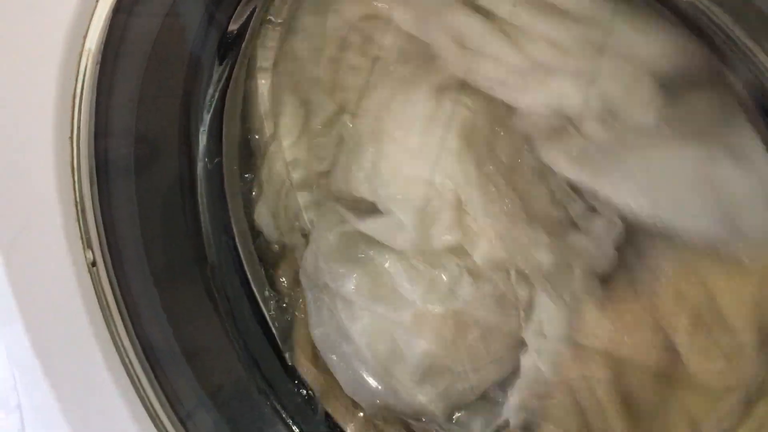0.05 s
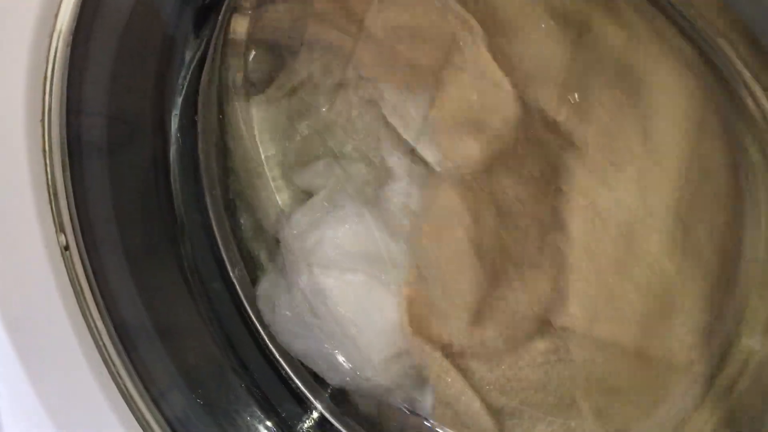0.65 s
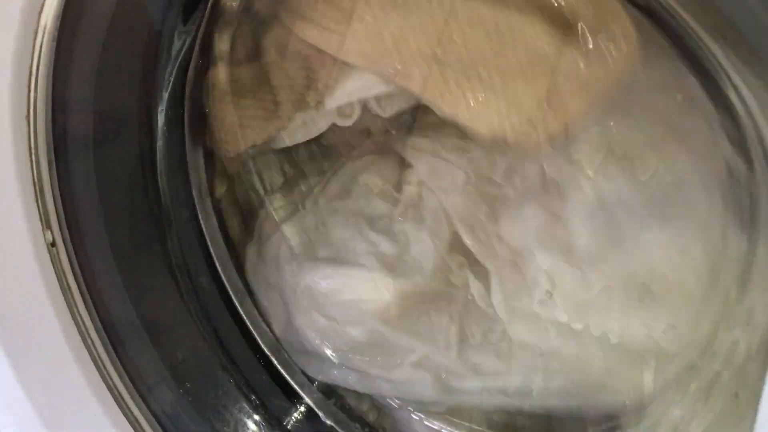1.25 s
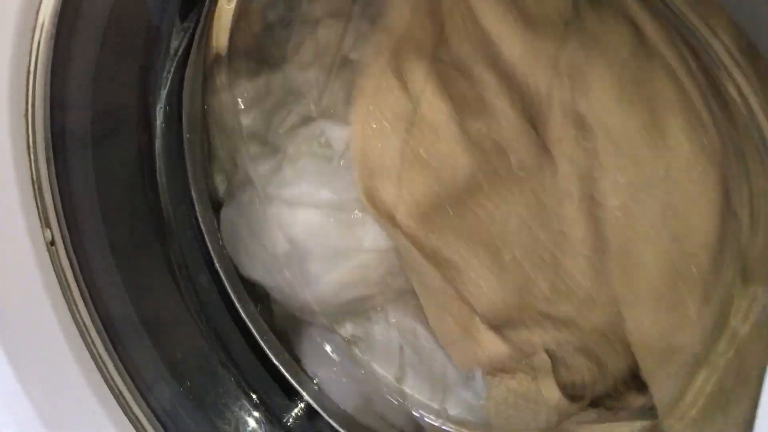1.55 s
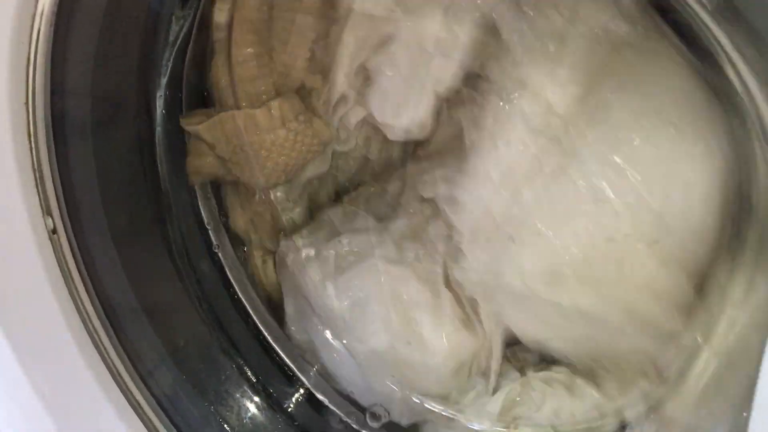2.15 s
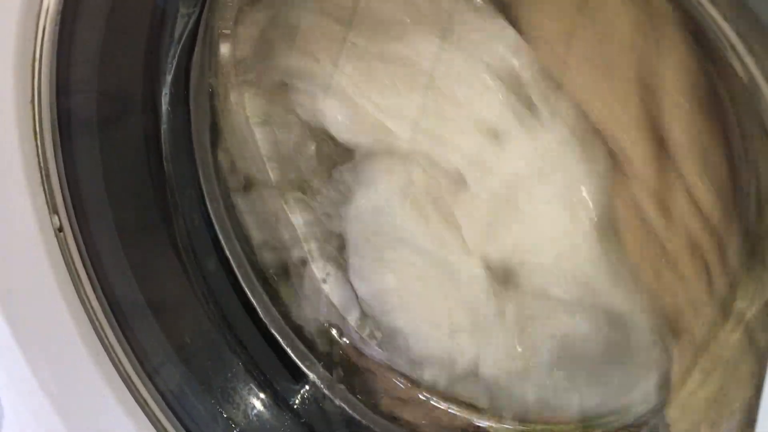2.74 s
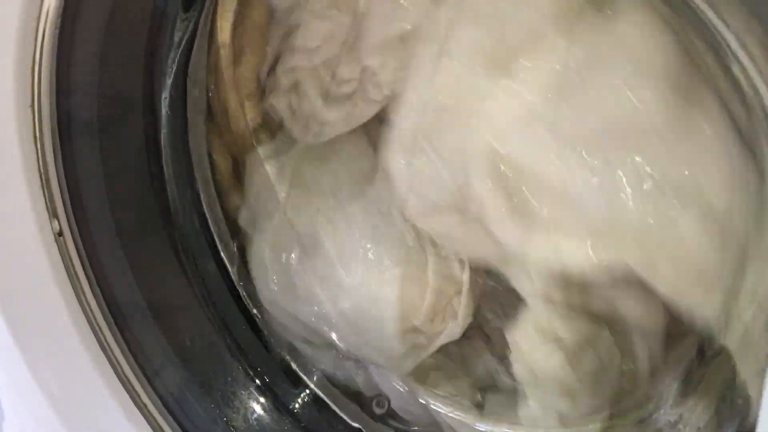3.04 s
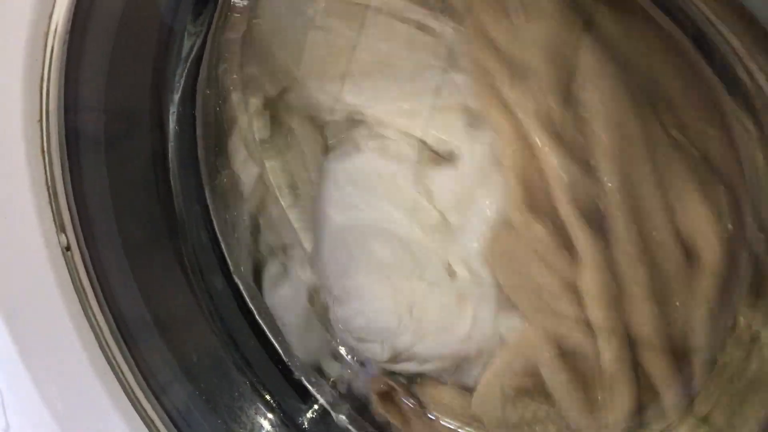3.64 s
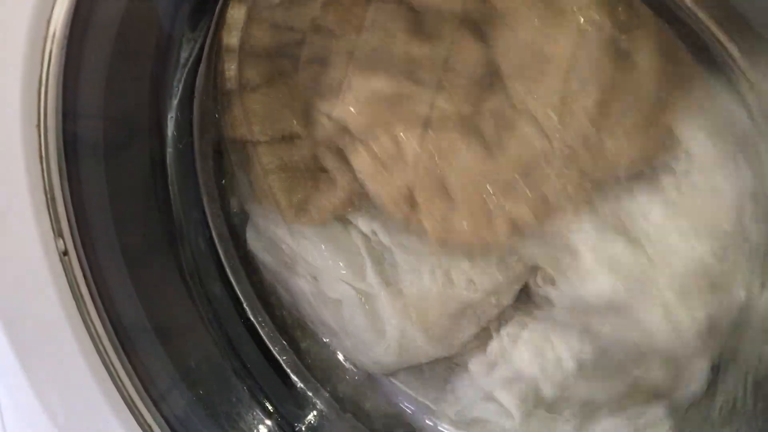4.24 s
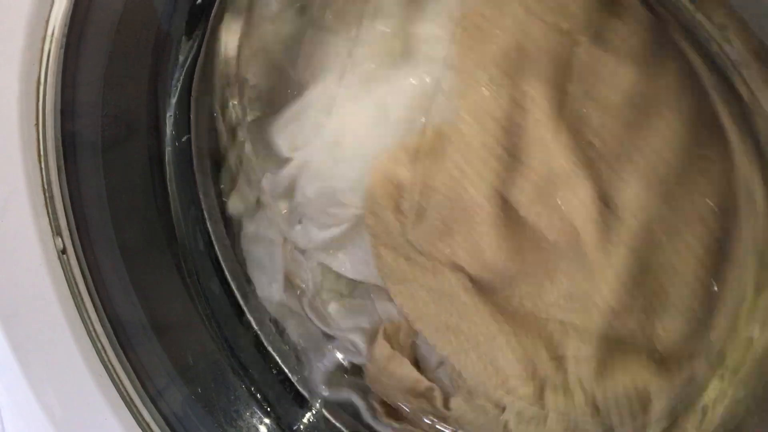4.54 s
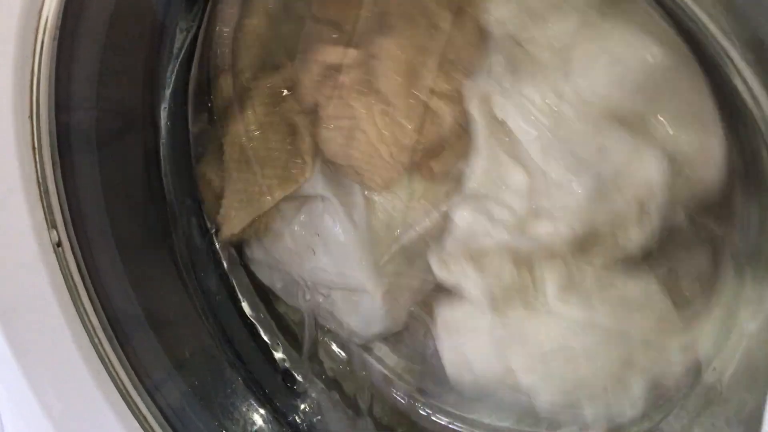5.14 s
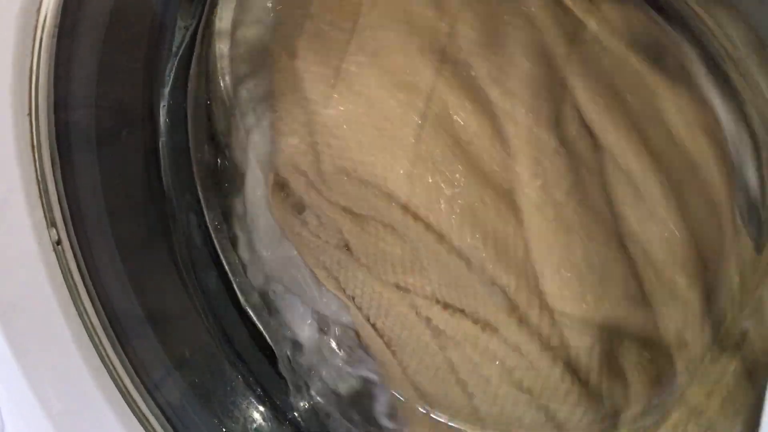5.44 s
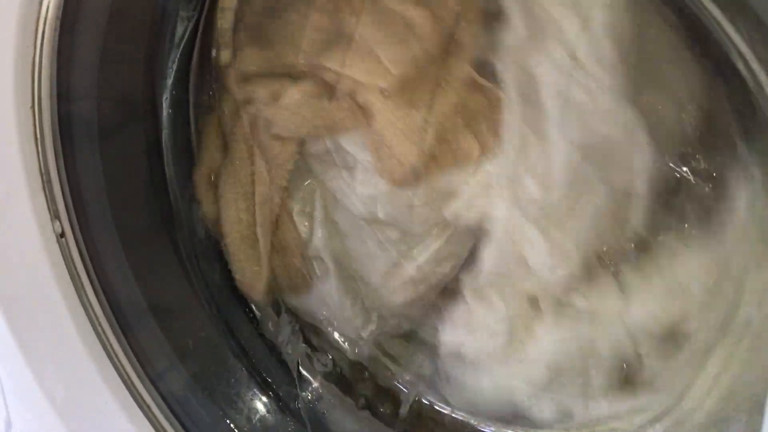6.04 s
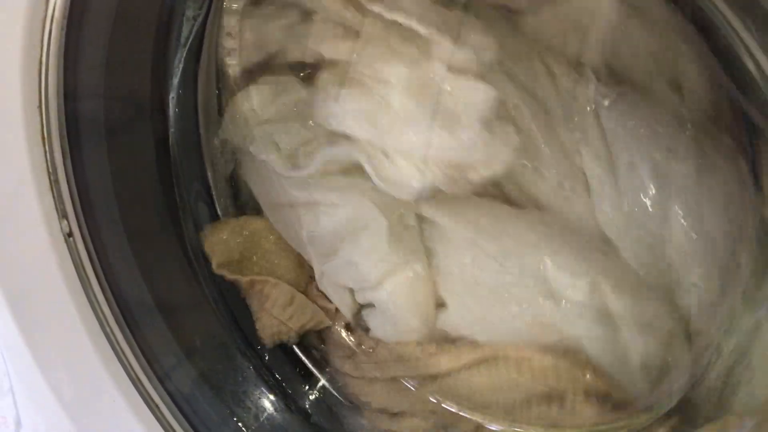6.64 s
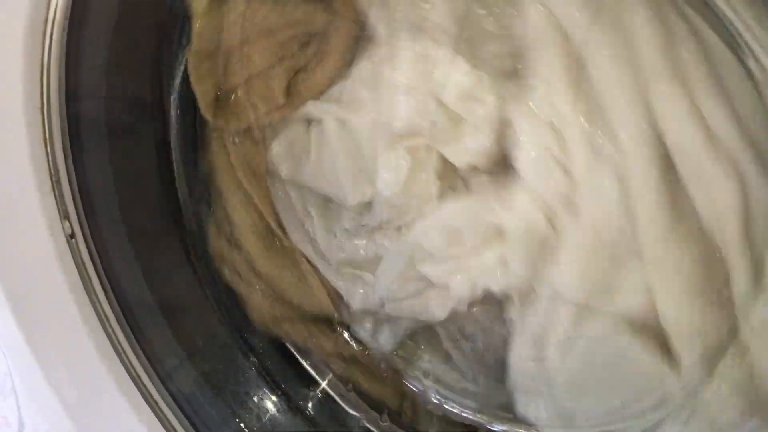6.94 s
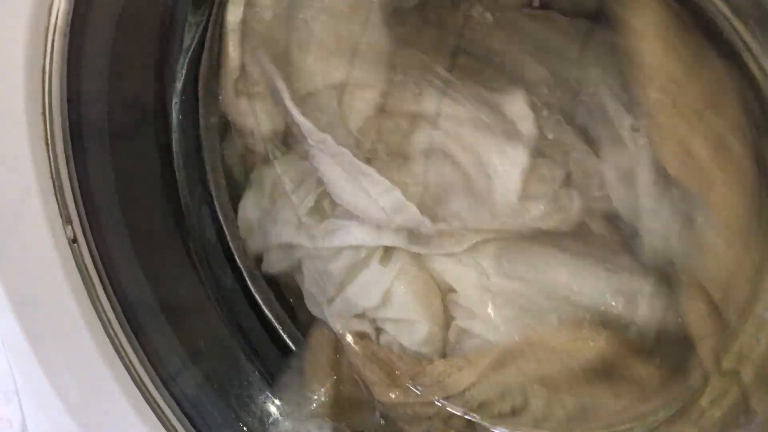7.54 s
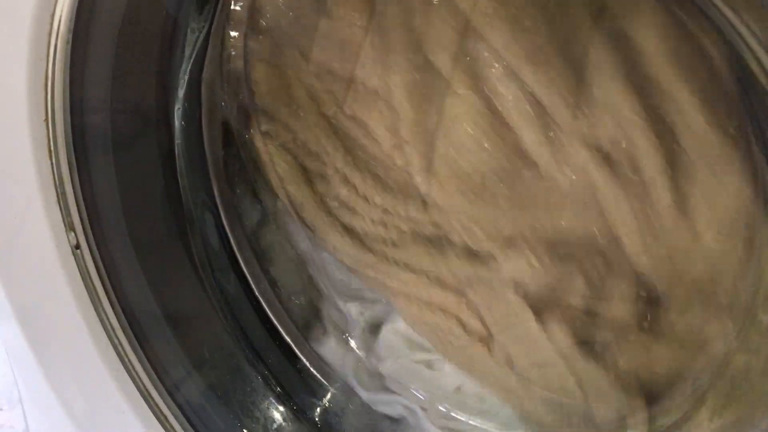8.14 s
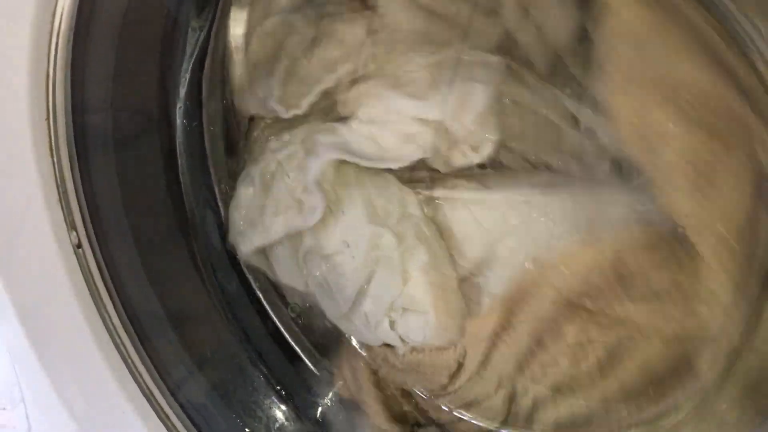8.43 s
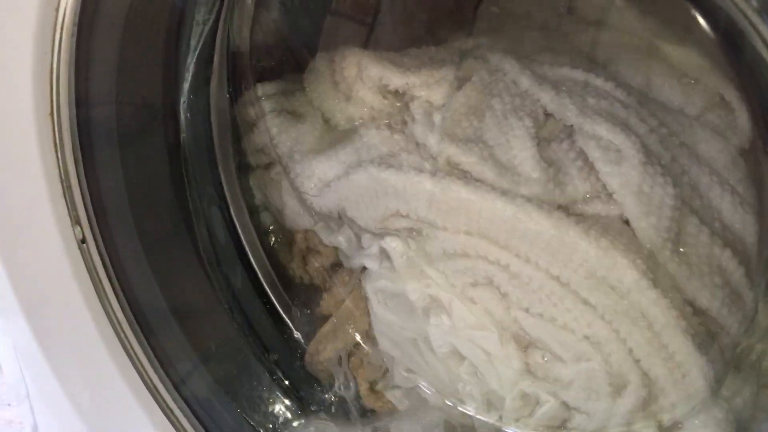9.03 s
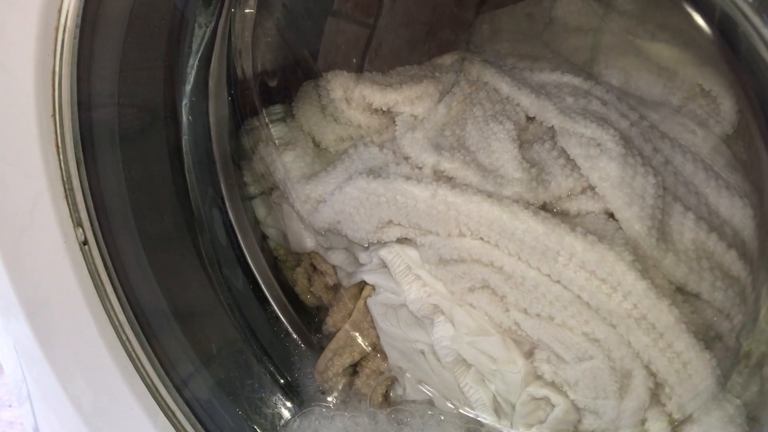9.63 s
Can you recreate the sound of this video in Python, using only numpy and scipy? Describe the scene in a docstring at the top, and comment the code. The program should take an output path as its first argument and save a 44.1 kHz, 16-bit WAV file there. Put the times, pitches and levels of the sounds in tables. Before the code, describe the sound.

A front-loading washing machine hums as wet laundry flops and splashes, then it stops and a single knock sounds.

```python
"""A small, hard-walled room, the microphone close to the door of a front-loading washing machine.
The motor hums and buzzes on the mains while the drum tumbles wet laundry. Cloth flops into shallow
water, which splashes, bubbles and spits at the door glass; the tub thuds underneath.
Near the end the motor cuts out, the load settles, and one knock sounds over the faint room tone."""
import sys
import numpy as np
from scipy import signal
from scipy.fft import rfft, irfft
from scipy.io import wavfile

SR = 44100
rng = np.random.default_rng(int(sys.argv[2]) if len(sys.argv) > 2 else 0)


def transcribe(signal):
    """Save signal, clipped to [-1, 1], as a 16-bit WAV file at the path in sys.argv[1]."""
    frames = np.atleast_2d(signal).T
    limited = np.clip(frames, -1, 1)
    pcm = np.round(limited * 32767).astype(np.int16)
    wavfile.write(sys.argv[1], SR, pcm)


N = 431298
TIME = np.arange(N) / SR
MAINS_HZ, MOTOR_OFF_S, COAST_S = 50.036, 8.52, 0.76
WASH_DB, RUMBLE_DB = -51.5, -48  # water and drum at full speed
SOAK_DB_PER_S = 0.26  # the wash quietens as the cloth takes up water
TRICKLE = 0.22  # share of the flow that keeps draining with the drum at rest
SLAP_RISE_S = 0.0027
SLOSH_FALL_S, SLOSH_FALL_SHARE = 0.0098, 0.61  # a slosh drains in this time plus a share of its swell

# Noise spectra at the microphone. Each row: frequency in Hz, relative density in dB.
ROOM_SPECTRUM = [(18, -49), (30, -3), (108, 0.5), (243, -6), (332, -6), (575, -18.5), (1050, -15.5),
                 (1770, -13.5), (2300, -20), (2550, -17), (2830, -25), (3590, -22.5), (4910, -31.5),
                 (10500, -39.5), (15500, -39.5)]  # room tone
THUD_SPECTRUM = [(20, -37), (38, -9.5), (60, -10.5), (90, -10), (130, 0.5), (220, 0), (290, -3.5),
                 (380, -3), (450, -14.5), (700, -23.5), (2000, -61)]  # tub and drum
WASH_SPECTRUM = [(200, -8.5), (450, -3), (800, -1.5), (1200, -4.5), (1430, -11), (1750, -6.5), (2100, -9.5),
                 (2500, -18), (3300, -19), (3850, -21.5), (7000, -34), (15500, -46)]  # water running through cloth
HISS_SPECTRUM = [(1500, -20.5), (3000, 3.5), (3580, -0.5), (5500, 2), (6800, -5), (7600, -1), (8200, -8),
                 (9600, -3), (11300, -9.5), (12800, -7), (14000, -12), (15700, -17)]  # thin hiss of the running machine
SPLASH_SPECTRUM = [(200, -19), (420, -2), (700, -3), (1100, -2.5), (1430, -8.5), (1750, -7), (2100, -10),
                   (2600, -18), (3500, -23.5), (5500, -30), (8000, -36.5), (15500, -45)]  # cloth hitting water
SPRAY_SPECTRUM = [(500, -17), (1200, -10.5), (2400, -0.5), (3200, 1.5), (3580, -5), (3950, -3), (4500, -5),
                  (5600, -8), (7000, -11.5), (14000, -27)]  # spray on the glass
FIZZ_SPECTRUM = [(3000, -36), (6500, 10), (9500, 6), (15500, 1)]  # the top end of a tick
# Motor hum. Each row: multiple of the mains, level in dB against the load curve, unsteadiness as a
# share of the amplitude.
HUM_HARMONICS = [(2, -1, 0.048), (4, -8.5, 0.8), (6, -10, 0.36)]
# Load curve of the motor. Each row: time in seconds, hum level in dB.
MOTOR_LOAD = [(0.0, -37), (0.04, -39), (0.14, -43.5), (1.81, -47), (1.97, -44.5), (2.16, -44.5),
              (2.33, -43), (3.25, -46.5), (3.51, -43.5), (5.39, -45.5), (5.93, -43.5), (6.38, -48.5),
              (6.52, -44.5), (8.45, -44.5)]
# Magnetic buzz of the motor. Each row: multiple of the mains, level in dB.
BUZZ_HARMONICS = [(36, -77.5), (38, -67.5), (40, -72), (42, -67), (44, -68), (46, -79.5), (48, -78),
                  (50, -88), (62, -74.5), (64, -69), (65, -77.5), (66, -71), (68, -81.5), (70, -86.5),
                  (166, -101), (168, -96), (169, -96), (171, -92), (172, -84.5), (173, -100), (174, -90)]
# Resonances of tub, door and drum. Each row: centre in Hz, width in Hz, lift in dB.
TUB_RESONANCES = [(71.2, 12.4, 14), (157, 28, 2.5), (185.5, 12, 4), (244, 21, 1.5), (318, 23, 7.5),
                  (339, 27.5, 5), (414.5, 12, 4), (487, 26, 5), (592, 13, 3.5), (667.4, 22, 6),
                  (921, 64, 5.5), (1303, 124, 9), (1554, 63, 9), (3500, 89, 6.5)]
# Ringing modes. Each row: frequency in Hz, relative level in dB, seconds to fall by 60 dB.
GLASS_MODES = [(1598, -4, 0.027), (1690, -4, 0.03), (2750, -18.5, 0.036), (3558, 0.5, 0.027),
               (4420, -10, 0.028), (5560, -15, 0.022)]  # the door glass
KNOCK_MODES = [(179, -61, 0.26), (404, -48, 0.13), (474, -54, 0.18), (582, -42.5, 0.13),
               (1110, -47.5, 0.09), (1270, -58, .07), (1990, -40, 0.029), (2420, -57, .05)]  # the closing knock
# Wet ticks at the door. Each row: start in seconds, then relative levels in dB of spray, high ring,
# low ring and fizz.
DOOR_SPITS = [(.5147, -51, -62, -43, -52), (1.438, -43, -48, -45, -60), (1.4425, -38, -34, -22.5, -57),
              (1.4525, -42, -48, -40, -58), (1.679, -41.5, -36, -36.5, -59), (2.278, -51, -48, -57, -73),
              (3.516, -48, -50, -36, -70), (3.6014, -45.5, -50, -48, -50), (4.128, -47, -37.5, -56, -65),
              (4.234, -59, -57, -35, -64), (4.502, -46, -48, -54, -65), (4.5163, -56, -43.5, -56, -69),
              (5.167, -61, -62, -32, -66), (5.476, -44, -45, -54, -64), (5.5166, -54, -38.5, -52, -71),
              (5.823, -46.5, -46, -54, -68), (6.587, -60, -46, -47, -68), (6.9782, -45, -44, -56, -66),
              (7.009, -39.5, -41.5, -48, -64), (7.144, -54, -44, -45, -71), (7.455, -53, -47, -60, -71),
              (8.864, -47.5, -45, -34.5, -65), (8.905, -51, -59, -46, -73), (8.927, -44, -38, -32.5, -62)]
# Cloth drops flat into the water. Each row: start in seconds, relative splash and thud levels in dB,
# fall time of the splash in seconds.
CLOTH_SLAPS = [(1.443, -46, -45, 0.047), (2.036, -44, -42, 0.012), (2.826, -43, -46, 0.0097),
               (3.796, -39, -37.5, .01), (4.23, -34.5, -29, 0.016), (4.308, -39, -52, 0.0095),
               (4.667, -41.5, -39.5, 0.032), (4.735, -48, -36.5, 0.028), (4.905, -41.5, -46, 0.015),
               (5.166, -33.5, -34, 0.018), (5.282, -44, -48, 0.017), (5.421, -46, -43.5, 0.022),
               (5.727, -42, -35.5, .015), (6.056, -40.5, -44, 0.011), (6.163, -41, -35, 0.044),
               (6.578, -38, -39.5, 0.02), (6.686, -41.5, -39.5, 0.028), (6.94, -42.5, -40, 0.021),
               (7.124, -41, -41, 0.03), (7.508, -45.5, -50, 0.075), (8.104, -41, -42, 0.033),
               (8.272, -38.5, -40, .008), (8.504, -42.5, -42, 0.012), (8.834, -46, -45, 0.038),
               (9.032, -49.5, -50, 0.031)]
# Cloth rolls over and pushes a wave. Each row: crest time in seconds, relative splash and thud levels
# in dB, swell time in seconds.
CLOTH_SLOSHES = [(.18, -45.5, -37, 0.061), (.345, -43.5, -43, 0.029), (.585, -49, -37.5, 0.051),
                 (.872, -46, -48, .02), (1.07, -45, -49, 0.057), (1.29, -48, -46.5, 0.1),
                 (2.13, -45.5, -37, 0.047), (2.303, -42, -37.5, .035), (2.74, -44.5, -44, 0.042),
                 (3.008, -44.5, -41.5, 0.023), (3.117, -46.5, -48, 0.015), (3.241, -40, -33.5, 0.019),
                 (3.377, -47, -49, 0.017), (3.532, -44.5, -40.5, 0.03), (3.667, -45, -41, .02),
                 (3.933, -45, -37, 0.024), (4.094, -41.5, -39, 0.033), (4.456, -46.5, -51, .04),
                 (5.092, -42.5, -46, 0.025), (5.492, -41, -36, 0.024), (5.632, -43, -52, .018),
                 (5.838, -44, -50, 0.027), (5.955, -47.5, -45, 0.057), (6.388, -43, -40.5, 0.053),
                 (6.436, -51, -48, 0.01), (6.798, -45.5, -48, 0.013), (7.039, -42.5, -34, 0.028),
                 (7.405, -47.5, -43, 0.047), (7.724, -46.5, -47, 0.04), (7.902, -39.5, -37.5, 0.022),
                 (8.012, -41.5, -46, 0.023), (8.322, -45, -46, 0.044), (8.625, -45.5, -46, 0.062)]


def gain_of(db):
    """Decibels to amplitude."""
    return 10 ** (np.asarray(db) / 20)


def unit_rms(x):
    """Scales to rms 1."""
    return x / np.sqrt(np.mean(x ** 2) + 1e-20)


def add(mix, start_s, sound):
    """Adds a sound into the mix at its start time."""
    part = mix[max(round(start_s * SR), 0):][:len(sound)]
    part += sound[:len(part)]


def surge(t, rise, fall):
    """A straight rise to height 1, then an exponential fall; times in seconds."""
    return np.minimum(t / max(rise, 1 / SR), 1) * np.exp(-np.maximum(t - rise, 0) / max(fall, 1 / SR))


def wander(hz):
    """Slow random drift of rms 1, rolling off above hz."""
    f = np.fft.rfftfreq(N, 1 / SR)
    return unit_rms(irfft(rfft(rng.standard_normal(N)) * np.exp(-(f / hz) ** 2), N))


def room_tone():
    """Faint steady noise of the room, behind everything."""
    hz, db = np.transpose(ROOM_SPECTRUM)
    shape = gain_of(np.interp(np.log(np.fft.rfftfreq(N, 1 / SR) + 1), np.log(hz), db))
    return gain_of(-60.5) * unit_rms(irfft(rfft(rng.standard_normal(N)) * shape, N))


def near_walls(x, t60, wet_db):
    """The direct sound reaches the microphone first, then sparse reflections from hard walls close by."""
    t = np.arange(SR // 2) / SR
    echoes = rng.choice([-1, 1], len(t)) * (rng.random(len(t)) < 2000 / SR)
    echoes = echoes * (t > .006) * gain_of(-60 * t / t60)
    return x + gain_of(wet_db) * signal.oaconvolve(x, echoes / np.linalg.norm(echoes))[:N]


def through_tub(x, spectrum, size=8192):
    """Rings x through a causal filter of unit energy: the given spectrum plus the tub's resonances."""
    f = abs(np.fft.fftfreq(size, 1 / SR))
    hz, db = np.transpose(spectrum)
    lift_db = sum(lift / (1 + (2 * (f - centre) / width) ** 2) for centre, width, lift in TUB_RESONANCES)
    shape = gain_of(np.interp(np.log(f + 1), np.log(hz), db) + lift_db)
    ring = np.fft.ifft(np.exp(np.conj(signal.hilbert(np.log(shape))))).real  # minimum phase
    return signal.oaconvolve(x, ring / np.linalg.norm(ring))[:len(x)]


def powered(fade_s):
    """Is 1 while the motor is powered, dying away afterwards."""
    return np.exp(-np.maximum(TIME - MOTOR_OFF_S, 0) / fade_s)


def motor():
    """Mains harmonics: a low hum that wavers with the load, and a magnetic buzz above it."""
    angle = 2 * np.pi * MAINS_HZ * TIME
    hum = sum(gain_of(db) * ((1 + shake * wander(6.1)) * np.sin(k * angle)
                             + shake * wander(7.2) * np.cos(k * angle))
              for k, db, shake in HUM_HARMONICS)
    hum *= gain_of(np.interp(TIME, *np.transpose(MOTOR_LOAD)))
    buzz = sum(gain_of(db) * (1 + 0.2 * wander(18)) * np.cos(k * angle + 0.64 * wander(11.3))
               for k, db in BUZZ_HARMONICS)
    idle = gain_of(-63) * np.sin(2 * angle)  # stays on after the motor cuts out
    return np.sqrt(2) * (hum * powered(0.035) + buzz * powered(0.0098) + idle)


def drops(per_s, spread_db):
    """Random clicks of rms 1: many small, a few large."""
    size = gain_of(spread_db * np.minimum(rng.exponential(1, N), 4))
    return unit_rms(size * rng.choice([-1, 1], N) * (rng.random(N) < per_s / SR))


def bubbles(flow, per_s, cycles, glide, low_hz=560, high_hz=2000, count=30):
    """Trapped air rings briefly at many pitches; glide bends each upward, flow sets the loudness."""
    t, out = np.arange(SR // 20) / SR, np.zeros(N)
    for hz in np.geomspace(low_hz, high_hz, count):
        age = t * hz / cycles
        envelope = (1 - np.exp(-3 * age)) * np.exp(-age)
        ping = envelope * np.sin(2 * np.pi * hz * t * (1 + glide * np.minimum(age, 2)))
        for place, size in rng.random((round(per_s * N / SR / count), 2)):
            add(out, place * N / SR, (.5 + size) * flow[int(place * N)] * ping)
    return out


def churn():
    """Behind the glass, water runs through the cloth as drops and bubbles while the drum rumbles round."""
    speed = np.clip(1 - (TIME - MOTOR_OFF_S) / COAST_S, 0, 1)  # steady, then coasting evenly to rest
    heave = wander(5.8)  # the load heaves unevenly as it turns
    flow_db = WASH_DB - SOAK_DB_PER_S * TIME + heave + 2.13 * wander(20)
    flow = (TRICKLE + (1 - TRICKLE) * speed ** 1.3) * gain_of(flow_db)
    water = through_tub(flow * drops(per_s=6000, spread_db=2), WASH_SPECTRUM)
    gurgle = gain_of(4) * bubbles(flow, per_s=60, cycles=8.8, glide=0.033)
    rumble = through_tub(drops(per_s=2500, spread_db=0.5), THUD_SPECTRUM)
    rumble *= speed * gain_of(RUMBLE_DB + 1.5 * heave + 1.74 * wander(12.5))
    hiss = through_tub(rng.standard_normal(N), HISS_SPECTRUM)
    hiss *= gain_of(-71.5 + 0.94 * wander(19)) * powered(0.35)
    # small drops keep the door's high ring tinkling
    tinkle = bubbles(flow, per_s=19, cycles=25, glide=0, low_hz=3580, high_hz=3560, count=6)
    return water + gurgle + rumble + hiss + gain_of(-2.5) * tinkle


def knock(start_s=9.615, rebound_s=0.0062):
    """A hard tick and its heavier rebound ring a few short modes."""
    t, out = np.arange(SR // 4) / SR, np.zeros(N)
    ring = sum(gain_of(db - 60 * t / t60) * np.sin(2 * np.pi * hz * t) for hz, db, t60 in KNOCK_MODES)
    burst = rng.standard_normal(len(t)) * surge(t, rise=.001, fall=0.015)
    tick = gain_of(-62) * through_tub(burst, FIZZ_SPECTRUM)
    tick += gain_of(-47.5) * through_tub(burst, WASH_SPECTRUM)
    add(out, start_s, .5 * ring + tick)
    add(out, start_s + rebound_s, ring)
    return out


def spits():
    """Water flicks against the door, right by the microphone: a short spray, and the glass rings."""
    t, (spray, fizz, rings) = np.arange(SR // 10) / SR, np.zeros((3, N))
    burst = surge(t, rise=0.0024, fall=0.0065)
    for start, spray_db, high_db, low_db, fizz_db in DOOR_SPITS:
        add(spray, start, gain_of(spray_db) * burst)
        add(fizz, start, gain_of(fizz_db) * burst)
        detunes = rng.uniform(-0.96, 1, len(GLASS_MODES))  # wet cloth on the glass detunes each blow
        for (hz, db, t60), detune in zip(GLASS_MODES, detunes):
            tone = np.sin(2 * np.pi * hz * (1 + 0.012 * detune) * t + np.pi * detune)
            level = gain_of(db + (low_db if hz < 2200 else high_db))
            add(rings, start, level * surge(t, rise=0.0013, fall=t60 / np.log(1000)) * tone)
    grain = rng.choice([-1., 1.], N)
    return (gain_of(-5) * through_tub(spray * grain, SPRAY_SPECTRUM)
            + gain_of(-4) * through_tub(fizz * grain, FIZZ_SPECTRUM) + gain_of(-2) * rings)


def smacks(against_splash_db=-2.5):
    """Each slap opens with a brief smack as flat cloth meets the water."""
    t, contact = np.arange(SR // 20) / SR, np.zeros(N)
    burst = surge(t, rise=0.00099, fall=0.003)
    for start, splash_db, _, _ in CLOTH_SLAPS:
        add(contact, start + SLAP_RISE_S, gain_of(splash_db + against_splash_db) * burst)
    return through_tub(contact * rng.choice([-1., 1.], N), SPLASH_SPECTRUM)


def landings():
    """Yields slaps and sloshes alike: start, splash level, thud level, rise time, fall time."""
    for start, splash_db, thud_db, fall in CLOTH_SLAPS:
        yield start, splash_db, thud_db, SLAP_RISE_S, fall
    for crest, splash_db, thud_db, swell in CLOTH_SLOSHES:
        yield crest - swell, splash_db, thud_db, swell, SLOSH_FALL_S + SLOSH_FALL_SHARE * swell


def flops():
    """Wet cloth lands just inside the door: spatter and bubbles, then the slower thud of the tub."""
    t, (splash, thud) = np.arange(SR // 3) / SR, np.zeros((2, N))
    for start, splash_db, thud_db, rise, fall in landings():
        add(splash, start, gain_of(splash_db) * surge(t, rise, fall))
        add(thud, start, gain_of(thud_db) * surge(t, rise + 0.0095, 0.01 + fall / 2))
    dull, bright = gain_of(2) * splash, gain_of(-1) * splash
    impacts = drops(per_s=9000, spread_db=0.2)
    lows = signal.sosfiltfilt(signal.butter(2, 1100, fs=SR, output="sos"), impacts)
    spatter = through_tub(dull * lows + bright * (impacts - lows), SPLASH_SPECTRUM)
    large_bubbles = bubbles(dull, per_s=160, cycles=4.7, glide=0.029, high_hz=1088, count=12)
    small_bubbles = bubbles(bright, per_s=170, cycles=8.9, glide=0.02, low_hz=1155, high_hz=1650, count=12)
    # spray tinkles on the door
    tinkle = bubbles(bright, per_s=70, cycles=33, glide=0, low_hz=3530, high_hz=3620, count=6)
    tub = through_tub(thud * drops(per_s=5000, spread_db=0), THUD_SPECTRUM)
    return (gain_of(-0.5) * spatter + gain_of(-1.5) * large_bubbles + gain_of(-2) * small_bubbles
            + gain_of(-14) * tinkle + gain_of(0.5) * tub)


def scene():
    """The machine close up in mono, its impacts echoing off the walls, over the room tone."""
    bed = motor() + churn()
    impacts = flops() + smacks() + spits() + knock()
    return (bed + near_walls(impacts, t60=0.27, wet_db=-13) + room_tone())[None]


def record(dry):
    """The recorder's band limit cuts off the highest treble."""
    lowpass = signal.firwin(801, 15720, window=("kaiser", 9), fs=SR)
    return signal.oaconvolve(dry, lowpass[None], "same")


dry = scene()
out = record(dry)
transcribe(out)
```